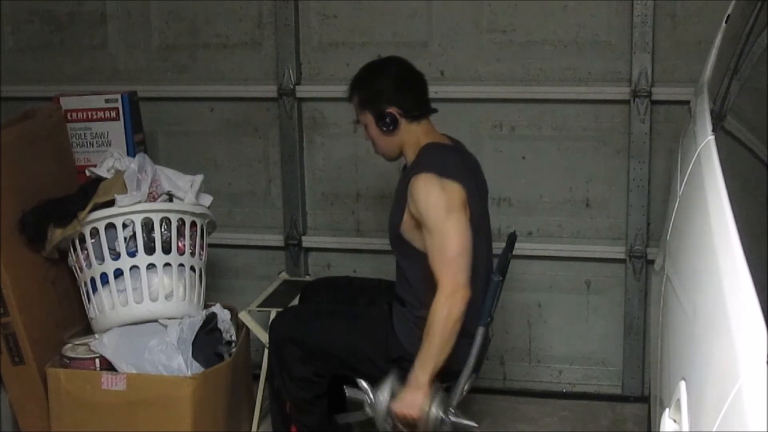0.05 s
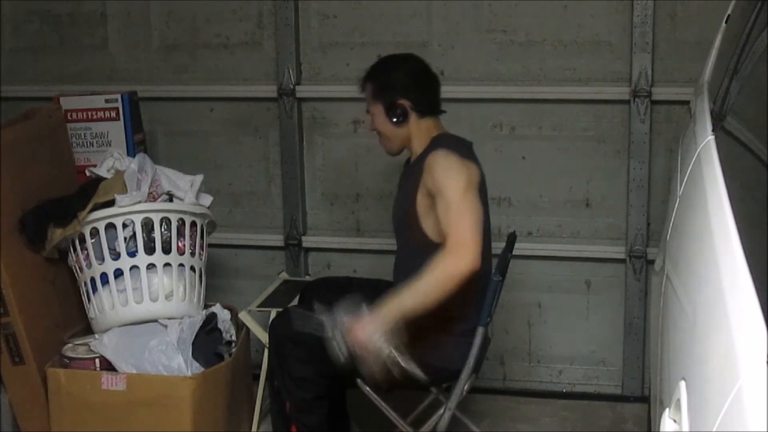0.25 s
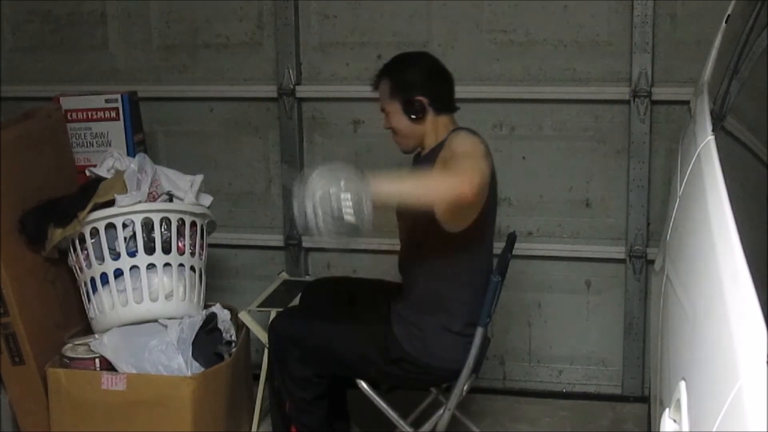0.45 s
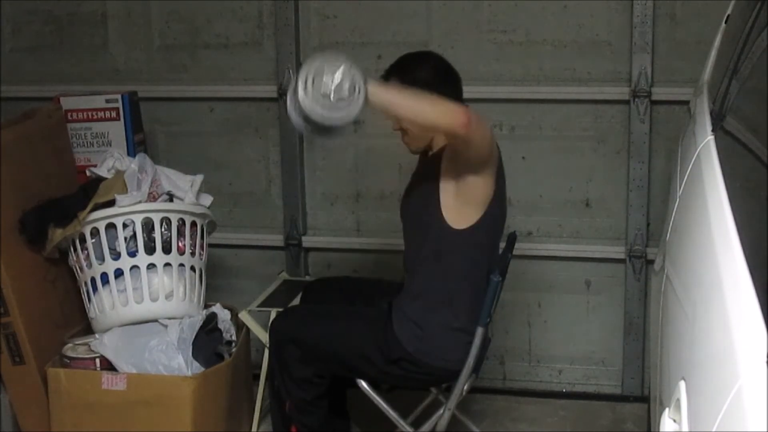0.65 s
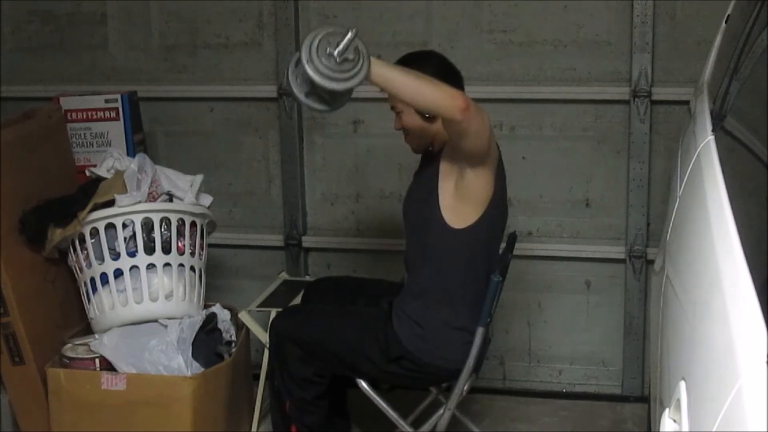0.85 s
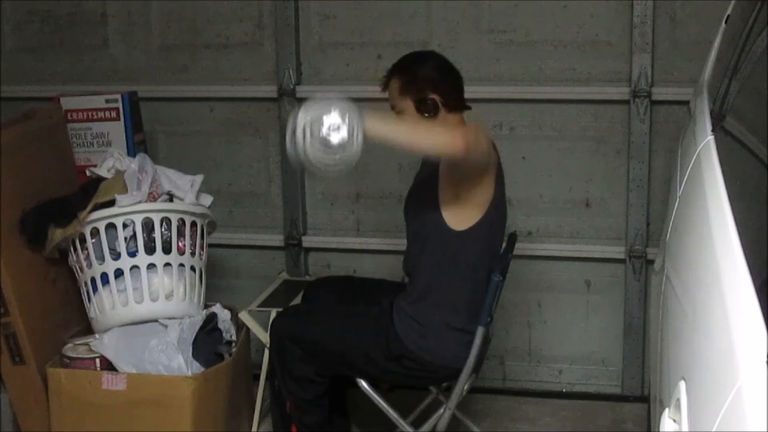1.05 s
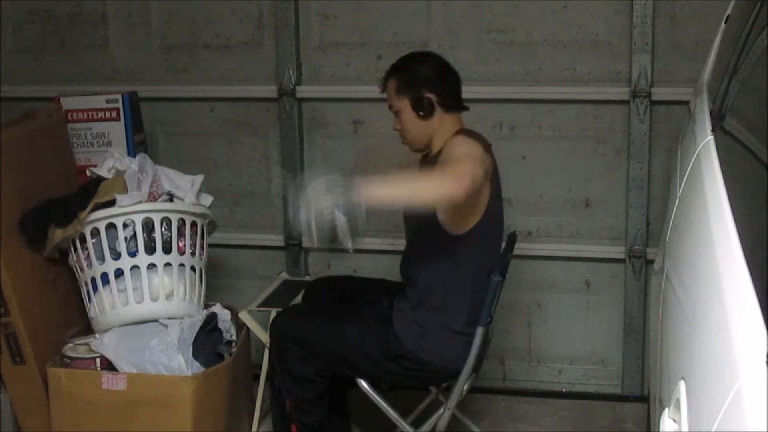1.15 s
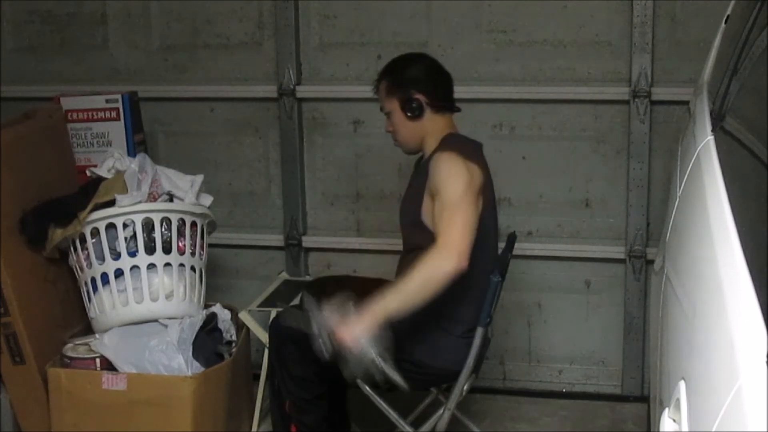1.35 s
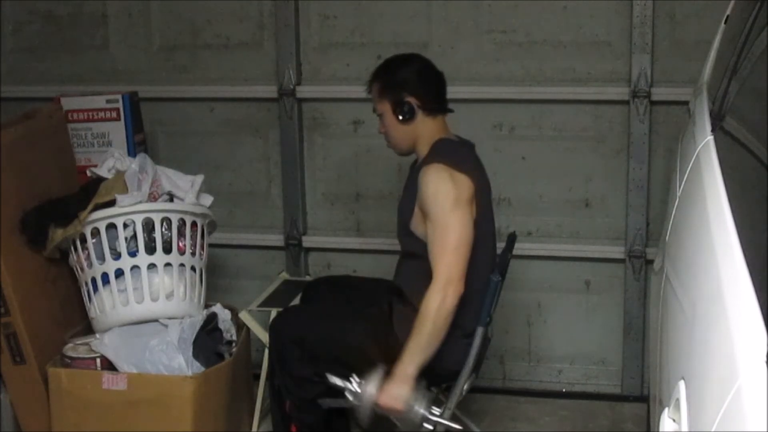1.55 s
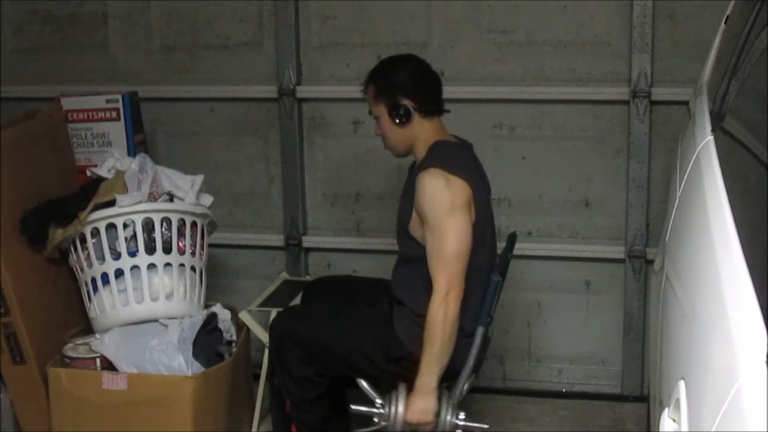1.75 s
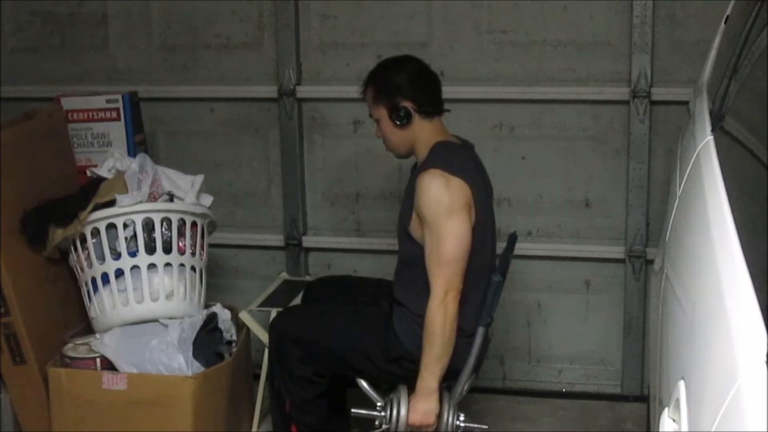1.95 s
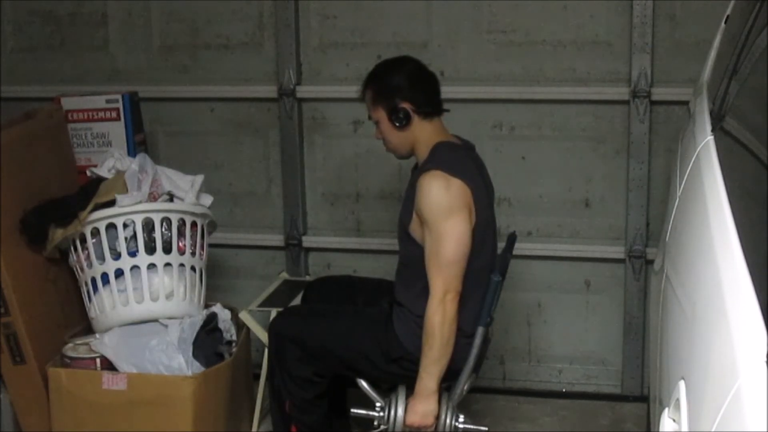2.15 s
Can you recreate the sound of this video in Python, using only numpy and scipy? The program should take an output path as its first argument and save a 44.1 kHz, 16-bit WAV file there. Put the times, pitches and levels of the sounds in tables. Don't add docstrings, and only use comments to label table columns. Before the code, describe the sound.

Loose iron dumbbell plates clank in a bare garage. A faint, steady distant machine whine and hiss runs until 1.1 s, then cuts off, leaving low rumble and mains hum. A very faint squeak comes near 1.65 s. At 1.77 s plates clack hard and chatter until 1.87 s; duller knocks settle from 2.05 to 2.16 s, with tiny squeaks and short echo. Camera sound, slightly dulled treble.

```python
import sys
import numpy as np
from scipy import signal
from scipy.fft import rfft, irfft
from scipy.io import wavfile
from scipy.ndimage import uniform_filter1d

SR = 44100
rng = np.random.default_rng(int(sys.argv[2]) if len(sys.argv) > 2 else 0)


def generate_wav(sig):
    pcm = np.round(np.clip(np.atleast_2d(sig).T, -1, 1) * 32767).astype(np.int16)
    wavfile.write(sys.argv[1], SR, pcm)


def level_to_linear(level):
    exponent = np.asarray(level, float) / 20
    return 10 ** exponent


N = 97549


def curve(table, hz):
    points = np.array(table)
    return np.interp(np.log(np.maximum(hz, 1)), np.log(points[:, 0]), points[:, 1])


def level(x, db):
    return x * level_to_linear(db) / np.sqrt(np.mean(x ** 2))


def unit_energy(x):
    return x / np.sqrt(np.sum(x ** 2))


def colour(x, spectrum, bumps=()):
    hz = np.arange(len(x) // 2 + 1) * SR / len(x)
    db = curve(spectrum, hz)
    for centre_hz, width_hz, gain_db in bumps:
        db = db + gain_db / (1 + ((hz - centre_hz) / (width_hz / 2)) ** 2)
    return irfft(rfft(x) * level_to_linear(db), len(x))


def walk(rate_hz):
    hold = int(SR / rate_hz)
    steps = np.repeat(rng.standard_normal(N // hold + 1), hold)
    smooth = uniform_filter1d(uniform_filter1d(steps, hold), hold)
    return 1.087 * smooth[:N]


def airy(spectrum, bumps, flicker_db):
    spec = rfft(colour(rng.standard_normal(N), spectrum, bumps))
    hz = np.arange(N // 2 + 1) * SR / N
    octave = np.floor(np.log2(np.maximum(hz, 32) / 32))
    return sum(irfft(spec * (octave == k), N) * level_to_linear(flicker_db * walk(7.6)) for k in range(10))


def flatten(x, width_hz):
    spec = rfft(x)
    bins = max(int(width_hz * len(x) / SR), 1)
    power = uniform_filter1d(np.abs(spec) ** 2, bins)
    y = irfft(spec / np.sqrt(power + 1e-12), len(x))
    y[len(x) * 3 // 4:] = 0
    return unit_energy(y)


def click(spectrum, n):
    cepstrum = irfft(curve(spectrum, np.arange(n // 2 + 1) * SR / n) * np.log(10) / 20, n)
    cepstrum[1:n // 2] *= 2
    cepstrum[n // 2 + 1:] = 0
    return irfft(np.exp(rfft(cepstrum)), n)


def room(t):
    # frequency in Hz, density in dB per Hz.
    room_spectrum = [(15, -27), (25, -11), (64, -2), (114, -8.5), (270, -17.5), (354, -16.5), (384, -18.5),
                     (988, -21), (16000, -50.5)]
    # centre in Hz, width in Hz, gain in dB.
    room_bumps = [(997, 224, 7), (3080, 100, 1.5), (75.4, 42, 1), (6060, 790, 3.5)]
    air = level(airy(room_spectrum, room_bumps, flicker_db=2.3), -53.5)
    hum = level_to_linear(-62 + 0.89 * walk(2.6)) * np.sin(2 * np.pi * 61 * t)
    return air + hum


def machine(t):
    # frequency in Hz, density in dB per Hz.
    hiss_spectrum = [(15, -25), (25, 4.5), (76, -0.5), (560, -10), (775, -10.5), (840, -12), (1560, -16.5),
                     (1740, -15.5), (16000, -43)]
    # centre in Hz, width in Hz, gain in dB.
    housing = [(950, 68, 5.5), (1320, 840, 11), (2860, 550, 3.5)]
    # frequency in Hz, level in dB.
    whine_tones = [(772.3, -57), (1545, -62), (3290, -84), (951, -67.5), (3270, -85), (2920, -76.5)]
    off_s, fade_s = 1.0965, 0.00075

    whine = np.zeros(N)
    for hz, db in whine_tones:
        loudness = np.sqrt(2) * level_to_linear(db + walk(12.6))
        unsteady_hz = hz * (1 + 0.00129 * walk(6.52))
        whine += loudness * np.sin(2 * np.pi * np.cumsum(unsteady_hz) / SR)
    hiss = level(airy(hiss_spectrum, housing, flicker_db=0.6), -49)
    return (hiss + whine) * np.clip((off_s - t) / fade_s, 0, 1)


def squeaks(t):
    # start in seconds, length in seconds, pitch in Hz, level in dB.
    rubs = [
        (1.637, 0.075, 3230, -69.5),
        (2.169, 0.058, 11100, -73.5),
        (2.174, .015, 5100, -66),
    ]
    out = np.zeros(N)
    for start, length, hz, db in rubs:
        whistle = signal.lfilter(*signal.iirpeak(hz, 25.5, fs=SR), rng.standard_normal(N))
        swell = np.sin(np.pi * np.clip((t - start) / length, 0, 1))
        out += level_to_linear(db) * swell * level(whistle, 0)
    return out


def plates():
    # start in seconds, level in dB, hardness from 0 to 1,
    # chatter length in seconds, ring against crack in dB.
    contacts = [(1.7746, -26.5, 0.6, 0.0011, -3), (1.778, -17.5, 1, .004, -3),
                (1.7857, -19, 1, 0.0053, -0.5), (1.807, -27, 0, 0.0016, -7), (1.82, -25, .6, 0.0023, -11),
                (1.829, -28.5, 1, 0.0046, -8), (1.846, -30.5, 0.85, 0.003, -16),
                (1.874, -40, .95, 0.0083, -15), (2.0471, -34.5, 0.43, 0.0022, -6.5),
                (2.051, -27.5, 0.02, 0.0048, -14), (2.065, -37.5, 0, 0.013, 3),
                (2.085, -35, 0.22, 0.015, -4.5), (2.101, -27.5, 0.14, 0.0061, -4),
                (2.137, -34.5, 0.25, 0.0098, -28), (2.163, -39.5, 0.7, 0.011, -16)]
    # frequency in Hz, level in dB, t60 in seconds.
    modes = [(299, -3.5, 0.059), (415, -4, 0.077), (603, -3.5, 0.072), (918, -0.5, 0.08), (964, -6, 0.076),
             (1080, -5, 0.035), (1320, -8, 0.022), (1620, -6, 0.033), (2026, -5.5, 0.052),
             (3000, -32, 0.084), (4170, -4.5, 0.021), (5141, -8, 0.017), (6270, -9.5, 0.014),
             (9410, -20, 0.1)]
    # frequency in Hz, density in dB per Hz.
    crack_spectrum = [(100, -17), (290, 2), (900, 3), (1500, -0.5), (3050, -8.5), (3500, -14.5),
                      (6800, -18), (15000, -29)]
    soft_hz, hard_hz = 1470, 13800

    n = SR // 4
    t = np.arange(n) / SR
    crack = unit_energy(click(crack_spectrum, n))
    out = np.zeros(N + SR)
    for start, db, hardness, length, ring_db in contacts:
        chatter = rng.standard_normal(n) * np.sqrt(t / length) * np.exp(-t / length)
        push = flatten(chatter, 2 / length)
        ring = np.zeros(n)
        for hz, mode_db, t60 in modes:
            spread_db, detune = 2 * rng.standard_normal(), rng.standard_normal() / 100
            decay = np.exp(-np.log(1000) * t / t60)
            ring += level_to_linear(mode_db + spread_db) * decay * np.sin(2 * np.pi * hz * (1 + detune) * t)
        body = level_to_linear(ring_db) * unit_energy(ring) + crack
        edge_hz = soft_hz * (hard_hz / soft_hz) ** np.clip(hardness, 0, 1)
        hit = signal.fftconvolve(push, body)[:n]
        hit = signal.lfilter(*signal.butter(1, edge_hz, fs=SR), hit)
        i = int(start * SR)
        out[i:i + n] += hit * level_to_linear(db) * 10
    band = signal.butter(2, [181, 14000], "bandpass", fs=SR, output="sos")
    return signal.sosfilt(band, out[:N])


def garage(x):
    # frequency in Hz, t60 in seconds.
    echo_t60 = [(125, 0.57), (300, 0.31), (900, 0.26), (2000, 0.28), (5000, 0.31), (10000, 0.3),
                (15000, 0.25)]
    echo_db, rise_s = -2.5, 0.0034

    n = SR // 2
    t, hz = np.arange(n) / SR, np.arange(n // 2 + 1) * SR / n
    spec = rfft(rng.standard_normal(n))
    half_octave = np.floor(2 * np.log2(np.maximum(hz, 64) / 64))
    tail = np.zeros(n)
    for k in range(17):
        t60 = curve(echo_t60, 64 * 2 ** (k / 2 + 0.31))
        tail += irfft(spec * (half_octave == k), n) * 10 ** (-3 * t / t60)
    tail *= 1 - np.exp(-t / rise_s)
    return x + level_to_linear(echo_db) * signal.fftconvolve(x, flatten(tail, 45))[:N]


def treble_gaps(x):
    # start in seconds, length in seconds, thinned above in Hz, empty above in Hz.
    gaps = [(.225, .022, 4000, 8000), (1.32, .02, 4000, 10000), (1.36, .025, 4000, 9500),
            (1.484, .038, 3000, 9000), (1.507, .04, 2200, 10000), (1.556, .035, 2000, 10500),
            (1.638, .022, 5000, 8000), (1.744, .024, 2500, 7000), (1.804, .026, 4200, 12000),
            (1.915, .022, 5000, 10500), (2.018, .026, 2500, 7000), (2.058, .02, 4000, 7000)]
    out = x.copy()
    for start, length, thin_hz, empty_hz in gaps:
        i, n = int(start * SR), int(length * SR)
        window = np.sqrt(signal.windows.tukey(n, 0.7))
        spec, hz = rfft(x[i:i + n] * window), np.arange(n // 2 + 1) * SR / n
        mag = np.abs(spec)
        threshold = (1.15 + 0.9 * hz / empty_hz) * uniform_filter1d(mag, size=15)
        strong = (mag > threshold) & (hz < empty_hz)
        change = (hz > thin_hz) * (strong * level_to_linear(5) - 1)
        out[i:i + n] += window * irfft(spec * change, n)
    return out


def scene():
    t = np.arange(N) / SR
    return (room(t) + machine(t) + squeaks(t) + garage(plates()))[None]


def top_cut(x):
    return signal.sosfilt(signal.butter(12, 16150, fs=SR, output="sos"), x)


def record(dry):
    port_dip = (7820, 145, -9.5)
    mic = colour(dry[0], [(10, 0), (20000, 0)], [port_dip])
    mic = signal.sosfilt(signal.ellip(8, 0.2, 70, 15750, fs=SR, output="sos"), mic)
    return top_cut(treble_gaps(mic)[None])


dry = scene()
out = record(dry)
generate_wav(out)
```